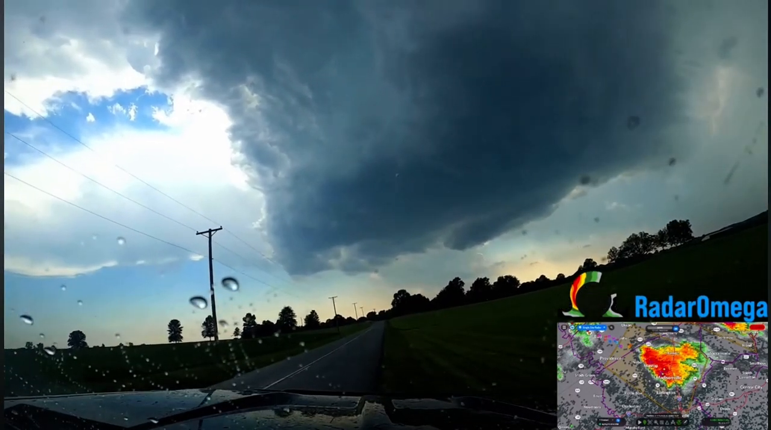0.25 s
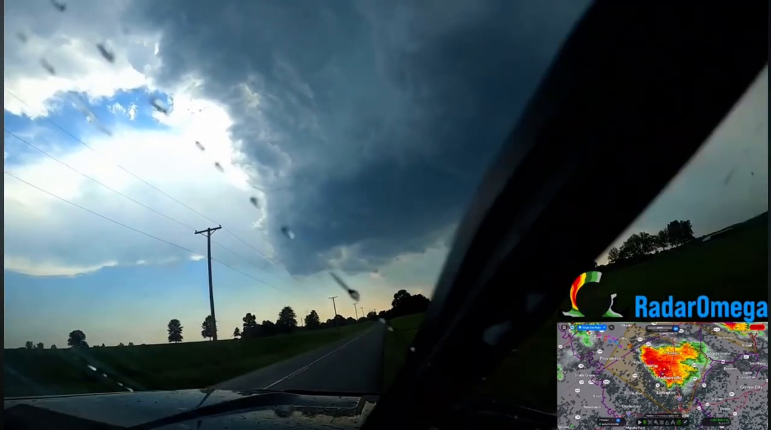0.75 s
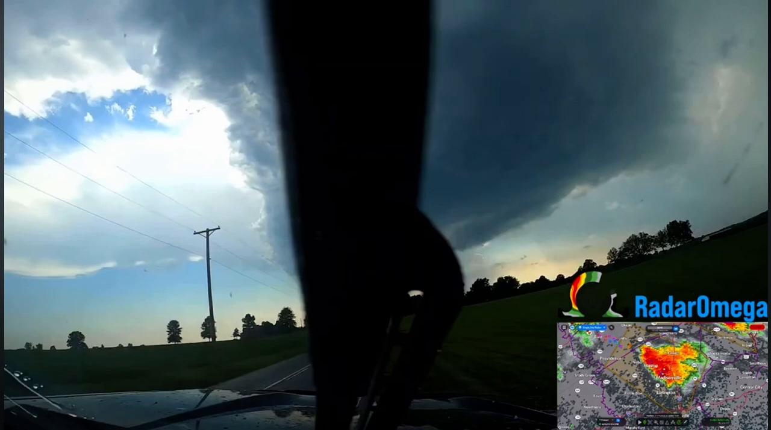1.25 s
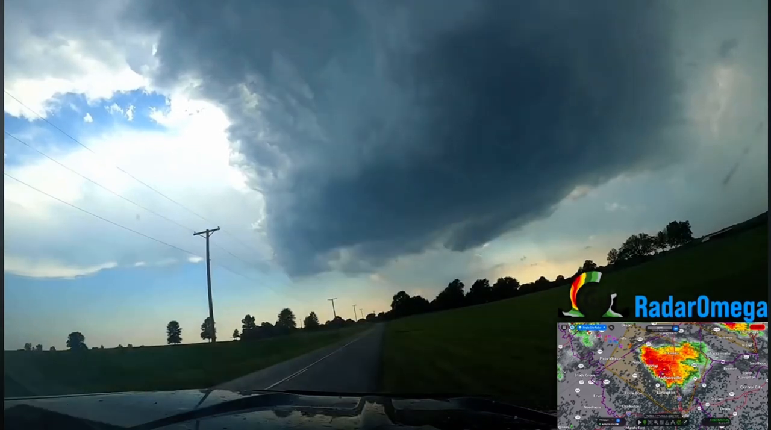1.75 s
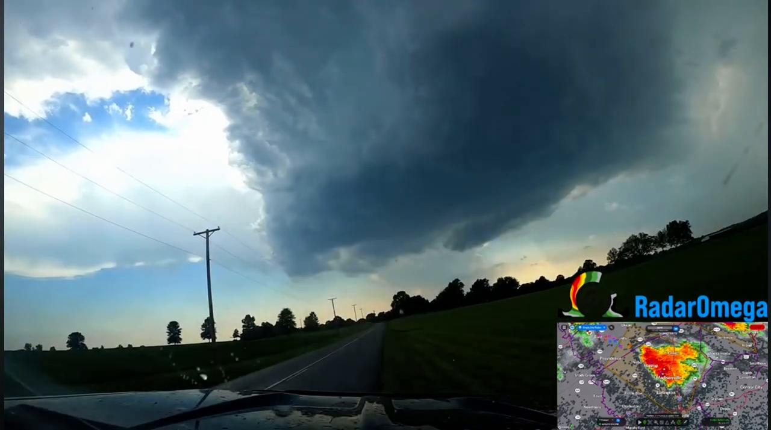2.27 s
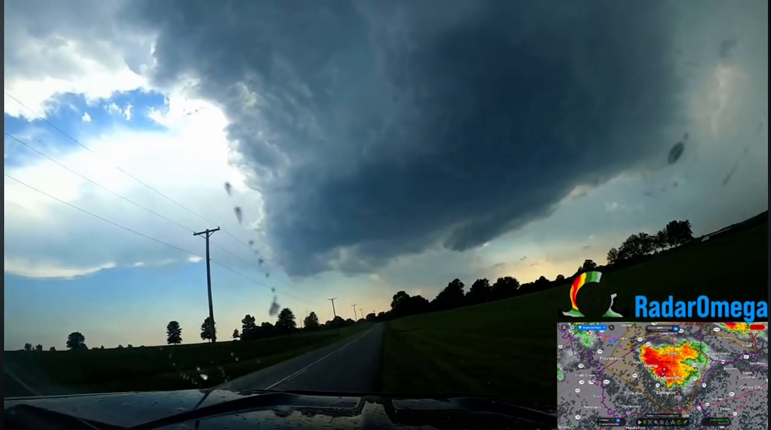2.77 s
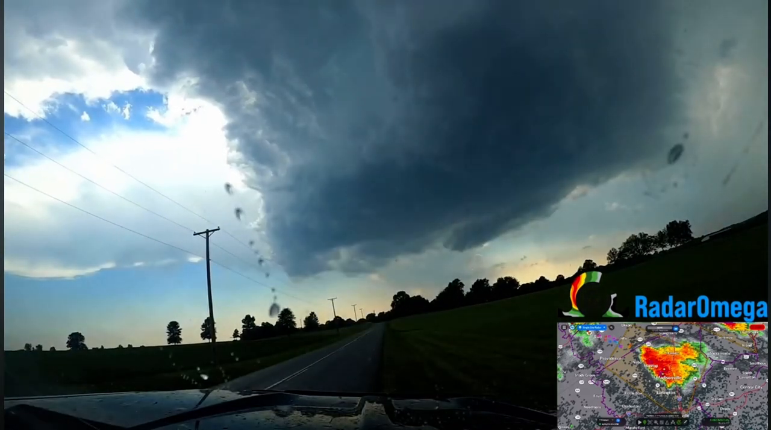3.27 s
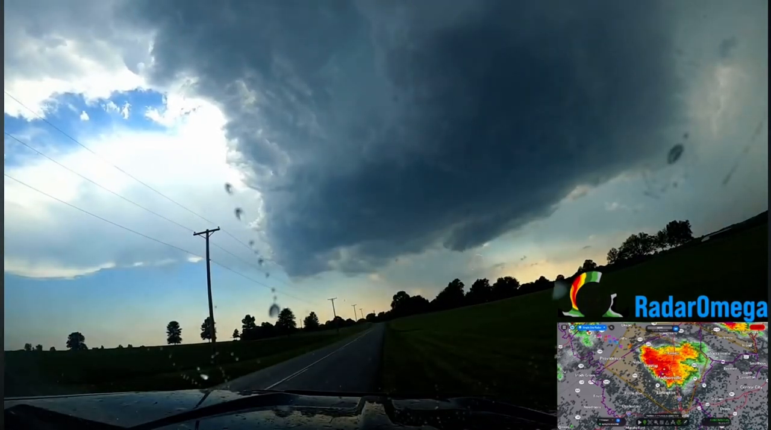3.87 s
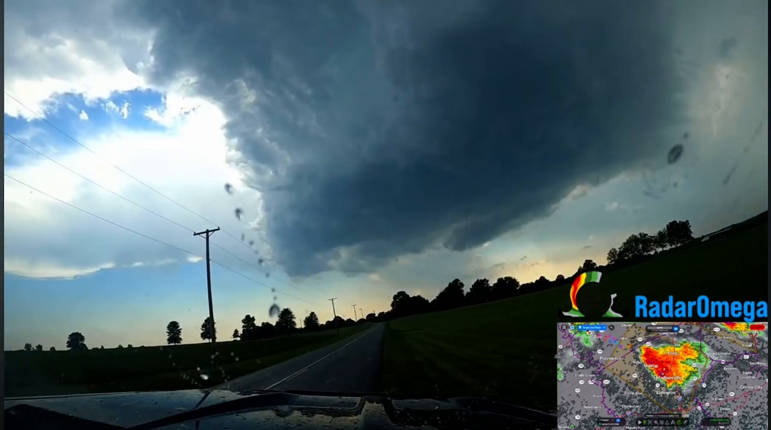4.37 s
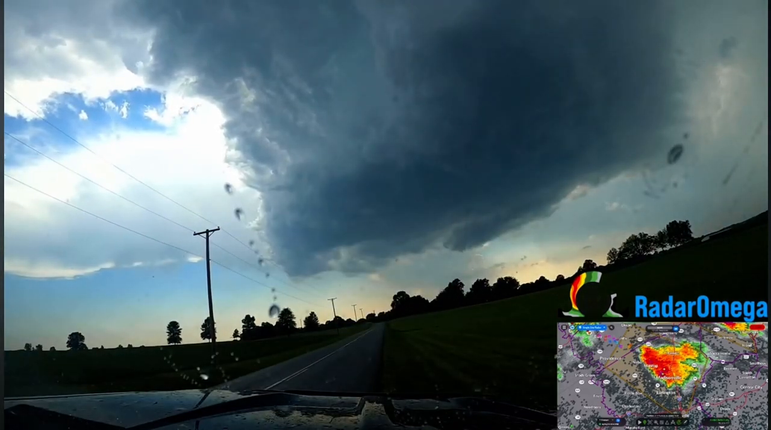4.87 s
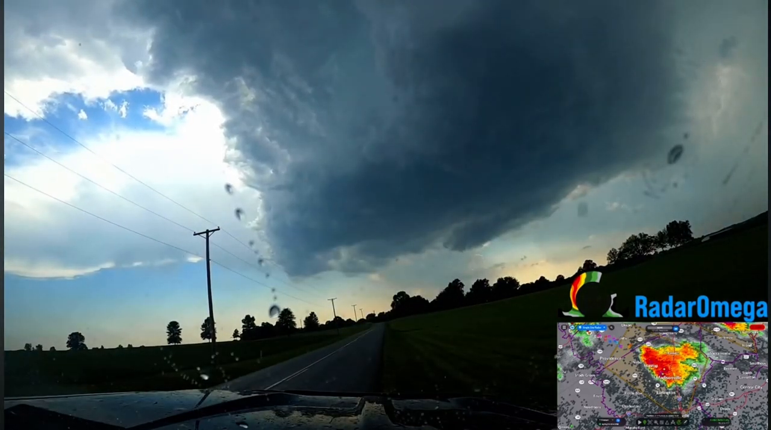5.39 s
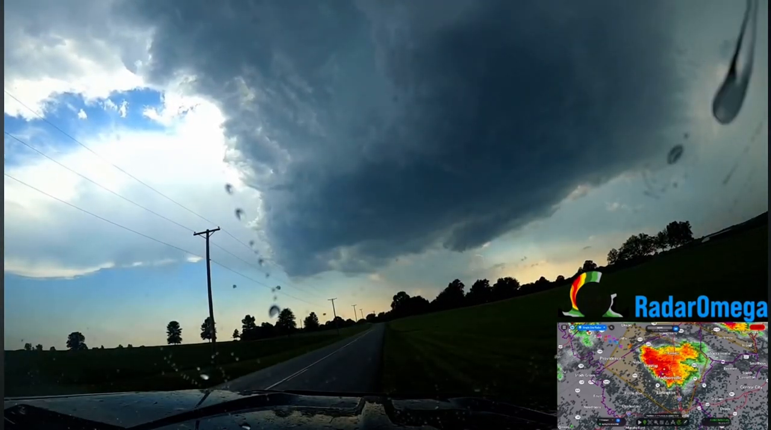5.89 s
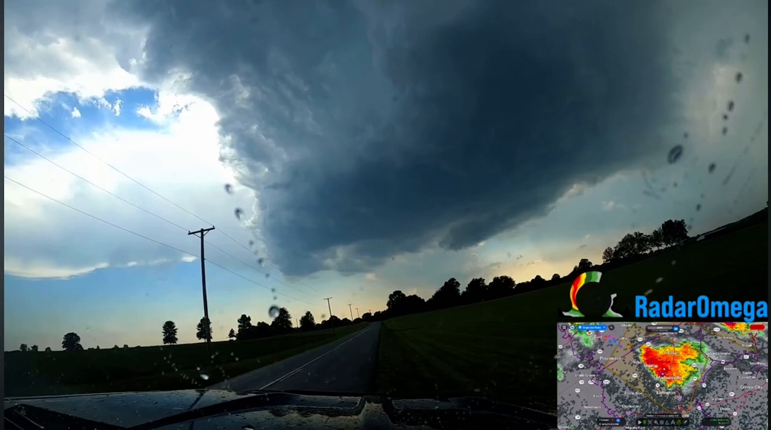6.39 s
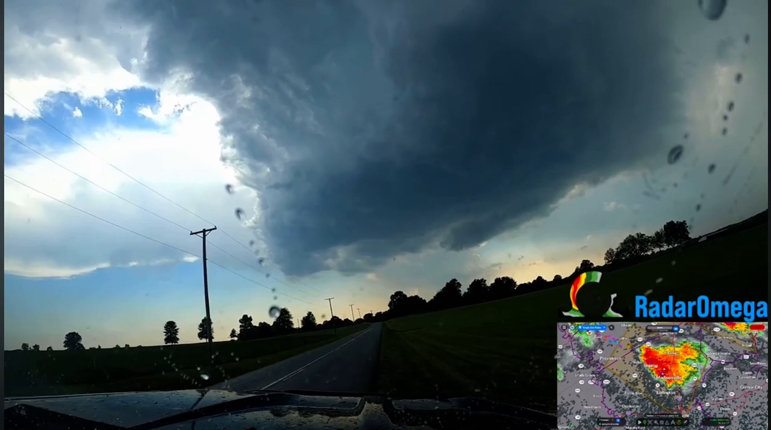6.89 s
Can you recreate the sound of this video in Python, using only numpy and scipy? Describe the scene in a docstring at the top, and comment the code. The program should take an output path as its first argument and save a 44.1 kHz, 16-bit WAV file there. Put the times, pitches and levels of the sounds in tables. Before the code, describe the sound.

Inside a closed car in a hailstorm, dry and close, one channel. Low muffled rumble and fine rain patter run throughout, with soft thuds on the lined roof. Hailstones knock on the metal from 0.2 s, hollow and quickly damped, each with a small crack of ice. A very faint, fuzzy wiper squeak passes at about 0.5-0.7 s, and the blade brushes back with a light hiss at 1.1-1.6 s. A strong deep knock lands near 1.85 s, then sharp windshield ticks dominate from 2 to 3.4 s, the brightest around 3.1 s. Another solid knock comes at 3.5 s, followed by a lighter spell. From 4.2 s blows gather, with a loud one near 4.7 s. The densest volley runs from 5.0 to 5.85 s, with a bass thump around 5.3 s and a hard glass smack at 5.5 s. After a brief lull, more knocks fall at 6.3-6.4 s, then crisp ticks continue to 7.1 s.

```python
"""Hail and rain on a car, heard from the cabin

Stones knock on the roof and body panels: damped bands of modes, with a crack of ice on contact.
Stones and big drops tick sharply on the windshield: a snap, a few chips and a short ring.
Fine drops are random strikes over a wash of filtered noise, and grow louder with the stones.
Below them lie the road's low rumble (bass-heavy noise) and soft thuds on the lined roof.
One faint wiper pass is a sine blurred by slow noise, then a hiss as the blade returns."""
import sys
import numpy as np
from scipy import signal
from scipy.fft import rfft, irfft
from scipy.io import wavfile

SR = 44100
rng = np.random.default_rng(int(sys.argv[2]) if len(sys.argv) > 2 else 0)


def to_wav(sig):
    """Store sig (one row per channel, or 1-D mono) as 16-bit WAV at the path in sys.argv[1].

    Samples outside -1..1 are clipped; the rate is SR.
    """
    pcm = np.clip(np.atleast_2d(sig), -1, 1) * 32767
    pcm = np.round(pcm).astype(np.int16)
    wavfile.write(sys.argv[1], SR, pcm.T)  # frames by channels


N = 314874  # length in samples
EDGE_HZ = 11850  # upper limit of the band
BANDS = np.geomspace(60, 12000, num=12)  # centres of the decay bands, Hz
T = np.arange(16384) / SR  # time after a blow, s
HZ = np.fft.rfftfreq(len(T), 1 / SR) + 1  # the 1 Hz offset avoids zero


def from_db(db):
    """Logarithmic level: decibels become an amplitude gain."""
    return 10 ** (np.asarray(db) / 20)


def unit(x):
    """Normalisation: scales a signal to rms 1."""
    return x / np.sqrt(np.mean(x ** 2) + 1e-20)


def read(points, hz):
    """Interpolation on a log-frequency axis, as pitch is heard."""
    f, value = np.transpose(points)
    return np.interp(np.log(hz + 1e-3), np.log(f), value)


def along(rows, axis):
    """Linear interpolation in time: one column of a curve, sample by sample."""
    rows = np.asarray(rows)
    return np.interp(np.arange(N) / SR, rows[:, 0], rows[:, axis])


def add(mix, s, sound):
    """Superposition: mixes a sound in at time s."""
    part = mix[max(round(s * SR), 0):][:len(sound)]
    part += sound[:len(part)]


# Body and glass modes shared by the blows and the steady noises.
# Each row: centre in Hz, full width at half the lift in Hz, lift in dB.
SHARED_MODES = [(138, 1.8, 10.5), (243.2, 9.3, 7.5), (500.5, 20, 4), (823, 360, 2), (1176, 20, 5),
                (1450, 18, 8), (1850, 29, 5.5), (3140, 170, 1.5), (4025, 63, 4), (4790, 54, 3.5),
                (5530, 150, 2.5), (6340, 570, -3.5)]


def cabin(hz):
    """Resonance: each shared mode lifts or dips the gain around its centre frequency."""
    lifts = (db / (1 + (2 * (hz - centre) / width) ** 2) for centre, width, db in SHARED_MODES)
    return from_db(sum(lifts))


RESONANCE = cabin(HZ)
# one triangular weight per band on the log-frequency axis; together they sum to 1
SPLIT = np.array([np.interp(np.log(HZ), np.log(BANDS), row) for row in np.eye(len(BANDS))])


def noise(points):
    """Spectral shaping: steady noise of a given spectrum through the body resonances, rms 1."""
    hz = np.fft.rfftfreq(N, 1 / SR)
    spectrum = rfft(rng.standard_normal(N)) * from_db(read(points, hz)) * cabin(hz)
    return unit(irfft(spectrum, N))


def ring(colour, envelopes, spot_db=2.5, count=100):
    """High modal density: a crowd of modes in random phase, each band with its own envelope."""
    # every spot lies on the crests of some modes and the nodes of others
    spot_log_hz = np.linspace(np.log(250), np.log(EDGE_HZ), count)
    spot = np.interp(np.log(HZ), spot_log_hz, np.r_[0, rng.standard_normal(count - 1)])
    phases = np.exp(2j * np.pi * rng.random(len(HZ)))
    modes = colour * RESONANCE * from_db(spot_db * spot) * phases
    bands = irfft(modes * SPLIT) * np.sqrt(len(T))
    struck = bands * envelopes
    # the blow sets the energy of each band, however its modes happen to beat
    energy = (bands ** 2).mean(1) * (envelopes ** 2).sum(1)
    return np.sqrt(energy / ((struck ** 2).sum(1) + 1e-30)) @ struck


def stone_curve(full_stone_db=-20, rise_s=0.04, fall_s=0.061):
    """Level curve: swells with each stone and falls away, driving the spray, drops and road layers."""
    t, curve = np.arange(N) / SR, np.zeros(N)
    for s, db, *_ in ROOF_STONES:
        distance = np.maximum((s - t) / rise_s, (t - s) / fall_s)
        curve += from_db(db - full_stone_db) * np.exp(-distance)  # a full_stone_db stone adds 1
    return curve


def swelling(curve, steady_db, swell_db, steepness):
    """Addition of powers: the gain of a steady layer plus its swell with the level curve."""
    return np.hypot(from_db(steady_db), from_db(swell_db) * curve ** steepness)


# What reaches the cabin from the glass. Each row: frequency in Hz, relative level in dB.
GLASS_RESPONSE = [(200, 10), (1000, 5), (2800, 3), (5500, 4), (7700, -0.5), (10500, -6), (12000, -17.5)]


def tick(db, low_hz, t60, tilt_db=0, snap_db=-12, snap_s=0.000088, treble_damping=0.31,
         attack_s=0.0013, chip_db=-7, chip_delay_s=.012, chip_s=0.0017, count=3):
    """Short hard contact: a snap, chips of ice landing, and a ring that dies fastest in the treble."""
    # tilt in dB per octave about 4 kHz, level below 1 kHz
    hardness_db = tilt_db * np.log2(np.maximum(HZ, 1000) / 4000)
    low_cut = np.sqrt(1 + (low_hz / HZ) ** 4)
    colour = from_db(db + hardness_db + read(GLASS_RESPONSE, HZ)) / low_cut
    decay_s = t60 * (BANDS[:, None] / 4000) ** -treble_damping  # t60 holds at 4 kHz
    snap = 1 + from_db(snap_db) * np.exp(-abs(T - attack_s) / snap_s)
    landings = rng.exponential(chip_delay_s, count)
    chips = sum((T > at) * np.exp(-abs(T - at) / chip_s) for at in landings)
    crush = np.minimum(T / attack_s, 1)
    return ring(colour, crush * from_db(-60 * T / decay_s) * (snap + from_db(chip_db) * chips))


# Spectrum of the fine spray. Each row: frequency in Hz, relative density in dB per Hz.
SPRAY_SPECTRUM = [(200, -45), (600, -11.5), (1200, -2.5), (2000, -9), (4000, -13.5), (6000, -17),
                  (9000, -24.5), (11500, -27.5)]


def rain(curve, drops_per_s=34, drop_t60=.11, size_spread_db=6.5, count=12):
    """Random arrivals: small drops of random size in several colours, over a wash of fine spray."""
    drops = np.zeros(N)
    for low_hz in np.geomspace(300, 3000, count):
        sizes = from_db(size_spread_db * np.minimum(rng.exponential(1, N), 2))
        strikes = sizes * (rng.random(N) < drops_per_s / count / SR)
        drops += signal.oaconvolve(strikes, tick(0, low_hz, drop_t60))[:N]
    lining = signal.butter(1, 2200, fs=SR, output="sos")
    muffled = unit(signal.sosfilt(lining, drops))  # by the roof lining
    spray = swelling(curve, steady_db=-77.5, swell_db=-65.5, steepness=0.89) * noise(SPRAY_SPECTRUM)
    return spray + swelling(curve, steady_db=-72, swell_db=-59.5, steepness=3.3) * muffled


# What reaches the cabin from the panels. Each row: frequency in Hz, relative level in dB.
PANEL_RESPONSE = [(30, -11), (80, -3), (125, 6), (190, 2), (290, 5), (450, 2.5), (1000, -3.5), (2000, -5.5),
                  (4000, -10.5), (10000, -28.5)]
# Decay of the panels. Each row: frequency in Hz, time to fall 60 dB in seconds, before the ring factor.
PANEL_DECAY = [(100, 0.35), (300, 0.15), (1000, 0.11), (3000, 0.065), (10000, 0.15)]


def knock(db, pitch_hz, emphasis_db, bright_hz, length, overtone_hz, lift_db=6.5,
          overtone_width=0.043, spread_s=0.018, rise_cycles=0.27, contact_s=0.0026, patch_width=0.33,
          crunch_db=2.5, crunch_hz=1900, crunch_s=0.042, direct_db=-2, direct_s=0.0025):
    """Bending waves: a blow on sheet metal spreads over the panel, bass last, then dies away."""
    patch_db = emphasis_db * np.exp(-(np.log(HZ / pitch_hz) / patch_width) ** 2)
    overtone_db = lift_db / (1 + (np.log(HZ / overtone_hz) / overtone_width) ** 2)
    # the patch radiates little below its own pitch; the contact time limits the treble
    edges = (1 + (.8 * pitch_hz / HZ) ** 6) * (1 + (HZ / bright_hz) ** 4)
    colour = from_db(db + patch_db + overtone_db + read(PANEL_RESPONSE, HZ)) / np.sqrt(edges)
    onset = 1 - np.exp(-T / (contact_s + rise_cycles / BANDS[:, None]))
    direct = 1 + from_db(direct_db) * np.exp(-T / direct_s)  # the struck spot speaks first
    hold = spread_s * length  # the fall starts gently over this time
    decay_s = length * read(PANEL_DECAY, BANDS)[:, None]
    fall_db = -60 * (np.hypot(T, hold) - hold) / decay_s
    # while the stone crumbles it keeps driving the upper middle of the panel's range
    octaves = np.log2(BANDS[:, None] / crunch_hz)
    crumble_db = crunch_db * np.exp(-octaves ** 2 - (T / crunch_s) ** 2)
    return ring(colour, onset * direct * from_db(fall_db + crumble_db))


# Spectrum of tyres and wind. Each row: frequency in Hz, relative density in dB per Hz.
ROAD_SPECTRUM = [(20, -54), (50, -26), (80, -6.5), (115, 3.5), (160, -4.5), (260, -3), (500, -12.5),
                 (900, -19), (2000, -29.5), (8000, -58)]
# Level of the road layer, with a thump near 5.3 s. Each row: time in seconds, relative level in dB.
ROAD_LEVEL = [(0.0, -59.5), (1.91, -57.5), (2.05, -58), (3.34, -62), (3.54, -60), (5.09, -57.5),
              (5.29, -44.5), (5.79, -70), (6.26, -53.5), (6.38, -59), (6.72, -60), (7.14, -58.5)]


def road(curve, rumble_db=-1.6, thud_db=-4.0, thuds_per_s=22, count=8):
    """Low-frequency boom: tyres and wind in the closed cabin, with soft thuds of drops on the roof."""
    thuds = np.zeros(N)
    for pitch_hz in np.geomspace(110, 420, count):
        strikes = (rng.random(N) < thuds_per_s / count / SR).astype(float)
        thud = knock(0, pitch_hz, emphasis_db=22, bright_hz=453, length=0.99,
                     overtone_hz=pitch_hz, lift_db=2.5)
        thuds += signal.oaconvolve(strikes, thud)[:N]
    boom = from_db(rumble_db) * noise(ROAD_SPECTRUM) + from_db(thud_db) * unit(thuds)
    return swelling(curve, along(ROAD_LEVEL, axis=1), swell_db=-53.5, steepness=0.29) * boom


# Stones and big drops on the glass. Each row: start in seconds, relative strength in dB,
# low edge in Hz (small = high), 60 dB decay at 4 kHz in seconds, hardness as a tilt in dB per octave.
GLASS_STRIKES = [(0.035, -51.5, 2940, 0.066, -0.5), (0.26, -53.5, 2500, 0.054, -12),
                 (0.721, -50, 883, 0.047, -2), (0.8425, -46, 1170.0, 0.058, 1.3),
                 (1.125, -47.5, 2060.0, 0.073, -1), (1.576, -52, 1330.0, 0.11, -0.5),
                 (1.715, -45.5, 900.0, 0.034, -3), (1.907, -52.5, 3000, 0.054, 9),
                 (1.985, -42.5, 1010, 0.098, -0.5), (2.113, -44, 910, 0.13, 3),
                 (2.137, -45.5, 920, 0.13, -2), (2.17, -56.5, 2500, 0.19, 2),
                 (2.277, -45, 3460, 0.059, 4.5), (2.484, -45, 330.0, 0.11, -2),
                 (2.616, -65, 1500, 0.091, -10), (2.949, -46, 2520, 0.042, -0.5),
                 (3.113, -58.5, 560, 0.12, -1), (3.065, -37, 2770, 0.08, 3), (3.274, -45, 1610, 0.077, 0.5),
                 (3.326, -44.5, 1430, 0.12, -1), (3.389, -46, 900.0, 0.15, 0.0),
                 (3.56, -49.5, 2350.0, 0.11, -0.5), (3.631, -54, 1200, 0.11, -9.5),
                 (4.115, -53.5, 3420.0, 0.054, 2.5), (4.429, -49.5, 270.0, 0.1, 1),
                 (4.759, -57, 930, 0.32, -3.5), (4.848, -57.5, 620.0, 0.12, -1),
                 (4.876, -52, 1670, 0.03, 0), (4.925, -58, 3000, 0.16, 2), (5.141, -51, 280, 0.05, -4.5),
                 (5.345, -66, 4000, 0.073, 7), (5.5107, -50.5, 2200, 0.12, 0),
                 (5.533, -33.5, 151, 0.12, 0.5), (5.77, -39.5, 1200, 0.083, -0.7),
                 (5.944, -55, 1510, 0.16, -1.5), (6.049, -60, 2500, 0.13, -4),
                 (6.183, -64.5, 900, 0.6, -5.5), (6.272, -47.5, 1010.0, 0.034, -1.5),
                 (6.45, -41.5, 1170.0, 0.084, 0), (6.565, -46.5, 545, 0.17, -0.5),
                 (6.724, -41, 139, 0.093, 1.5), (6.816, -41, 3000, 0.085, 1.5), (6.962, -40, 1250, 0.11, 0),
                 (7.097, -51, 3550.0, 0.21, -0.5)]


def windshield(glass_db=-2.0):
    """Hard impact on a stiff plate: sharp ticks on the glass just ahead."""
    out = np.zeros(N)
    for s, db, low_hz, t60, tilt_db in GLASS_STRIKES:
        sound = tick(db + glass_db, low_hz, t60, tilt_db, snap_db=-9.0, snap_s=0.0011, attack_s=0.00078)
        add(out, s, sound)
    return out


# Stones on the panels. Each row: start in seconds, relative strength in dB, pitch of the struck patch
# in Hz, emphasis of that pitch in dB, brightness in Hz (short contact = bright), ring as a factor on
# the panel decay, relative crack of the ice in dB, overtone that the spot favours in Hz.
ROOF_STONES = [(.17, -19, 272, 4.5, 2550, 1.57, -35, 1910), (.329, -22.5, 200, 14, 2970, 1.22, -40.5, 1970),
               (.634, -23, 315, -5, 3800, 1.5, -41, 2190), (.744, -27.5, 197, 1, 3070, 1.38, -47, 706),
               (.846, -36.5, 124, 22, 260, 0.44, -65, 2470),
               (1.043, -20, 300, 0.5, 3330, 1.43, -42.5, 1900),
               (1.397, -21, 160, -7, 3040, 1.5, -41.5, 793), (1.617, -31, 192, -3, 1760, 0.69, -54.5, 1180),
               (1.678, -26.5, 227, 8, 5000, 0.54, -33.5, 780), (1.761, -38, 400, 4, 9000, 1.2, -52, 715),
               (1.841, -23, 206, 11.5, 4700, 0.81, -33, 343),
               (1.854, -16.5, 115, 4.5, 2150, 1.41, -62, 364),
               (2.385, -27.5, 249, 15.5, 3800, 1.36, -36.5, 1510),
               (2.844, -33.5, 156, 3, 764, 1.05, -59, 433), (3.017, -32.5, 805, 12, 9000, 0.69, -37, 1380),
               (3.43, -37.5, 203, 8, 5560, 1.1, -51, 334), (3.475, -18.5, 222, 2, 2880, 1.6, -37, 506),
               (3.583, -28, 695, 4, 2200, 1.4, -43.5, 1860), (3.694, -36.5, 109, -3, 2110, 2.4, -56, 1340),
               (3.764, -35, 213, 1, 6540, 1.18, -66, 1840), (3.932, -38, 92, 11, 7750, .75, -55.5, 950),
               (4.102, -38, 192, 13, 4800, 1.27, -81, 670), (4.17, -20.5, 412, -2, 2540, 1.43, -39, 1920),
               (4.46, -29, 183, 7.5, 3460, 1.2, -46.5, 1160),
               (4.511, -23.5, 464, 8.5, 2050, 1.28, -50, 463), (4.574, -22, 263, 2, 3480, 1.36, -45, 2230),
               (4.666, -14, 664, -6, 2250, 1.33, -49, 1164),
               (5.012, -19.5, 385, -0.5, 2480, 1.2, -44.5, 1020),
               (5.171, -23.5, 188, 13, 4400, 0.39, -44, 2370),
               (5.194, -25, 134, 18.5, 4000, 0.74, -43, 2950),
               (5.244, -27.5, 105, 20.5, 4400, 0.64, -42.5, 273), (5.31, -29, 300, -8, 2090, .5, -62, 1140),
               (5.391, -25.5, 380, 7, 1010, 0.96, -60, 390),
               (5.562, -20.5, 1440, 3.5, 4150, 0.93, -36, 1510),
               (5.612, -24.5, 420, 9, 5680, 0.68, -37.5, 464),
               (5.632, -23.5, 138, -3, 2270, 1.6, -39.5, 1140),
               (5.844, -14.5, 1340, 4, 1490, 0.74, -32.5, 900), (6.231, -43, 220, 12, 2980, 1.9, -69, 494),
               (6.304, -21.5, 119, 0, 3380, 1.65, -43, 487), (6.354, -28, 430, 5, 9000, 1.04, -45, 2050),
               (6.407, -15.5, 172, -2.5, 2630, 1.55, -41.5, 516)]


def roof(crack_low_hz=1500, crack_t60=0.1, knock_db=-2, crack_db=-3.0):
    """Impact excitation: each stone cracks on contact and sets its panel ringing."""
    out = np.zeros(N)
    for s, db, pitch_hz, emphasis_db, bright_hz, length, ice_db, overtone_hz in ROOF_STONES:
        add(out, s, knock(db + knock_db, pitch_hz, emphasis_db, bright_hz, length, overtone_hz))
        add(out, s, tick(ice_db + crack_db, crack_low_hz, crack_t60))
    return out


# Rubber blade singing on wet glass. Each row: time in seconds, pitch in Hz, relative level in dB.
BLADE_WHISTLE = [(.44, 2100, -76), (.52, 2110, -67.5), (.59, 2060, -69), (.66, 2090, -66), (.72, 2050, -85)]
# The blade brushing back across the glass. Each row: time in seconds, level in dB.
BLADE_RETURN = [(1.0, -100), (1.15, -77), (1.3, -82.5), (1.5, -73), (1.62, -102), (1.75, -100)]
# Spectrum of that brushing. Each row: frequency in Hz, relative density in dB per Hz.
BRUSH_SPECTRUM = [(1500, 13), (3000, 11), (6000, 12), (9000, 14), (11500, 3)]


def wiper(width_hz=120):
    """Friction: the rubbing blade whistles faintly and fuzzily, and hisses on its way back."""
    slow = signal.butter(2, width_hz, fs=SR, output="sos")
    flutter = unit(signal.sosfilt(slow, rng.standard_normal(N)))
    t = np.arange(N) / SR
    singing = (t > BLADE_WHISTLE[0][0]) & (t < BLADE_WHISTLE[-1][0])
    phase = 2 * np.pi * np.cumsum(along(BLADE_WHISTLE, axis=1)) / SR
    whistle = singing * from_db(along(BLADE_WHISTLE, axis=2)) * flutter * np.sin(phase)
    hiss = from_db(along(BLADE_RETURN, axis=1)) * noise(BRUSH_SPECTRUM)
    return whistle + hiss


def scene():
    """Superposition: all sources sum in the cabin, in one channel."""
    curve = stone_curve()
    return (rain(curve) + road(curve) + windshield() + roof() + wiper())[None]


def record(dry):
    """Band limitation: a linear-phase low-pass removes what lies above the upper edge."""
    low_pass = signal.firwin(255, EDGE_HZ, window=("kaiser", 8), fs=SR)
    return signal.oaconvolve(dry, low_pass[None], "same")


dry = scene()
out = record(dry)
to_wav(out)
```